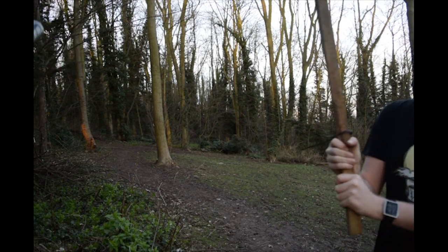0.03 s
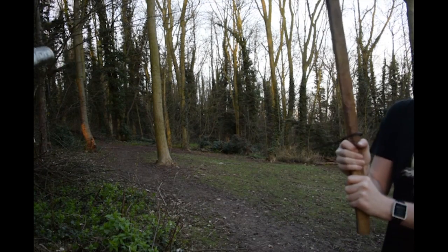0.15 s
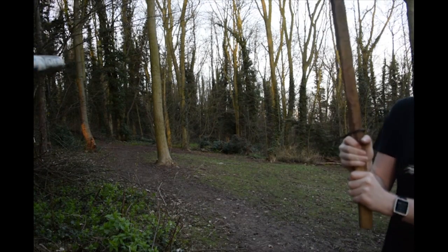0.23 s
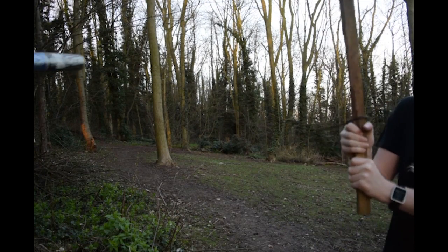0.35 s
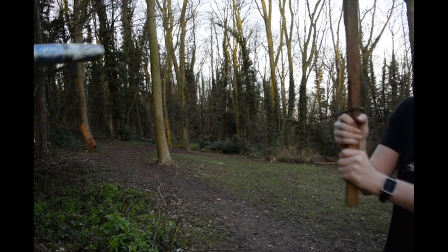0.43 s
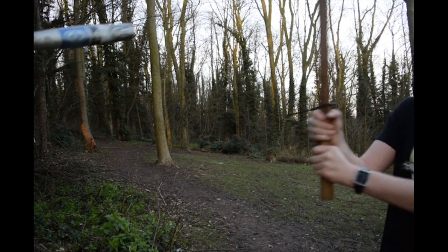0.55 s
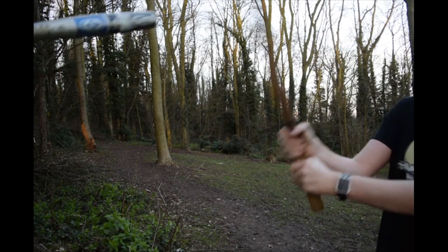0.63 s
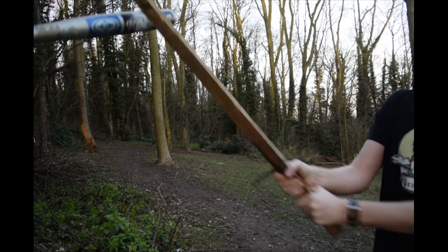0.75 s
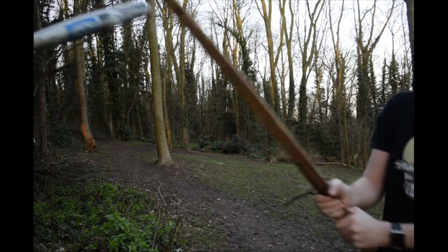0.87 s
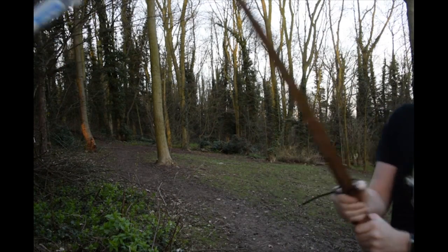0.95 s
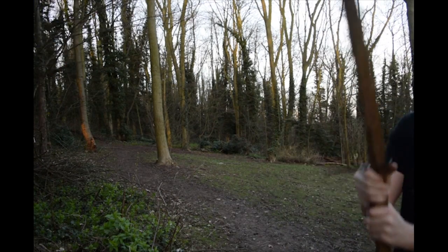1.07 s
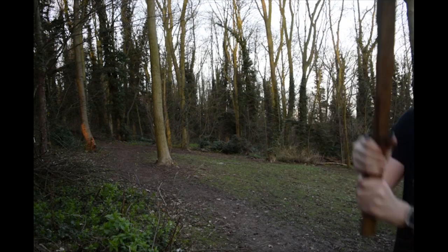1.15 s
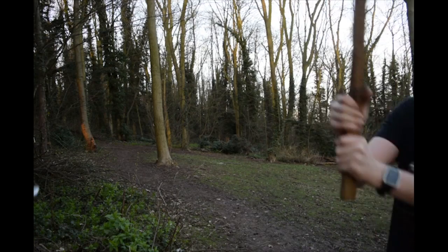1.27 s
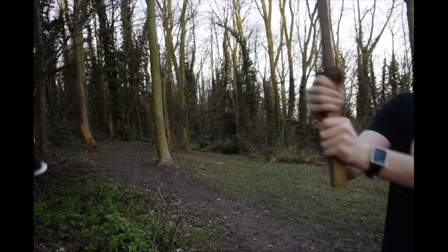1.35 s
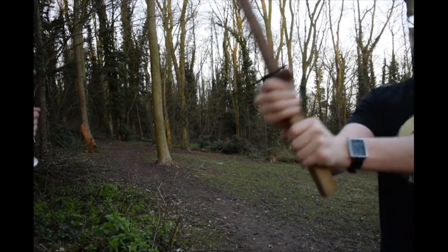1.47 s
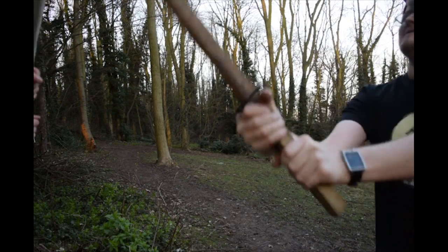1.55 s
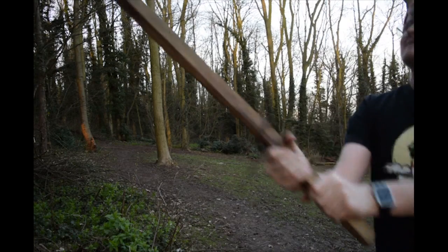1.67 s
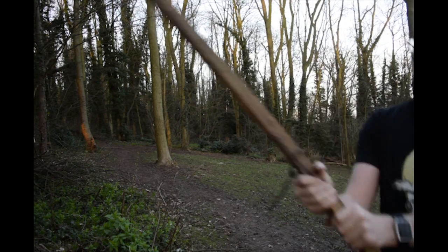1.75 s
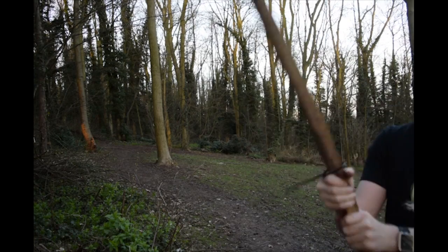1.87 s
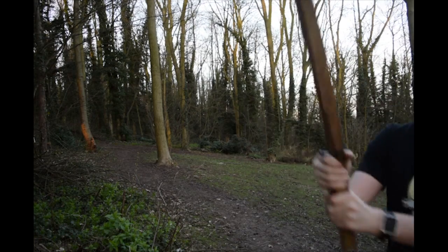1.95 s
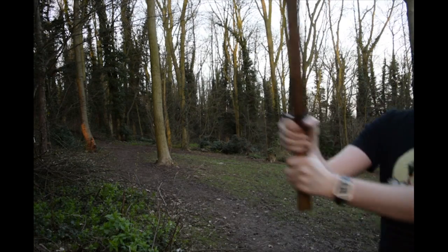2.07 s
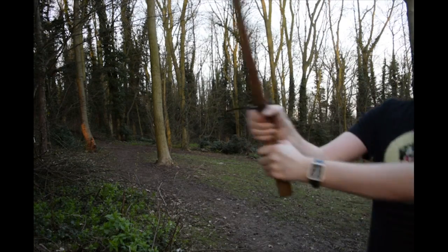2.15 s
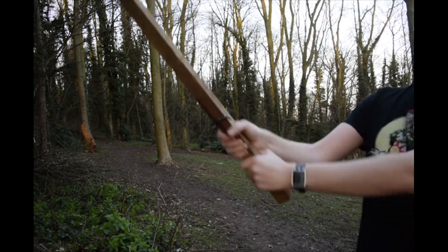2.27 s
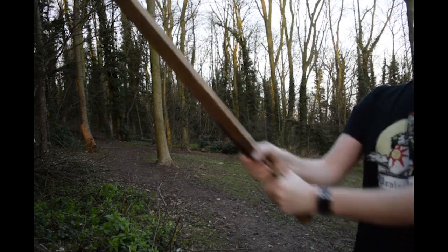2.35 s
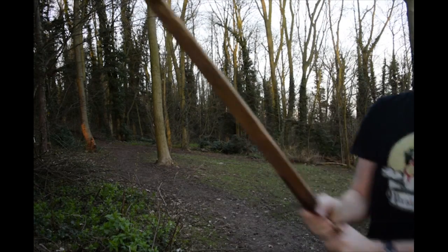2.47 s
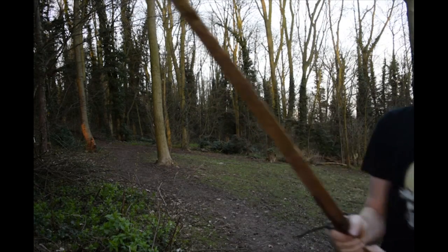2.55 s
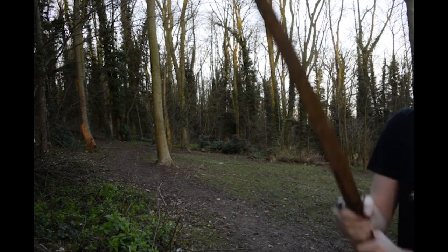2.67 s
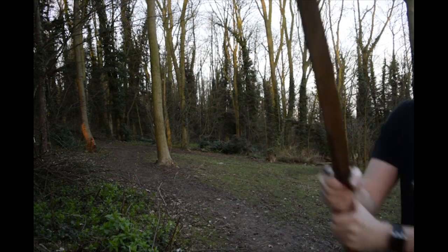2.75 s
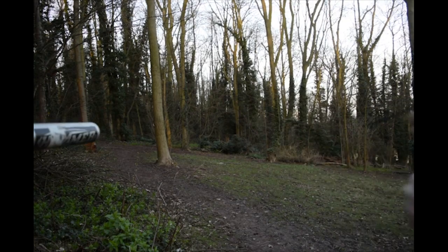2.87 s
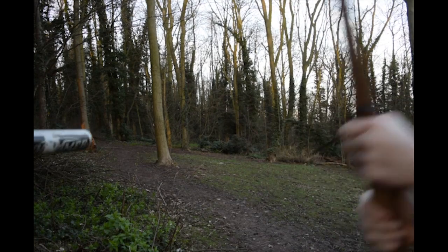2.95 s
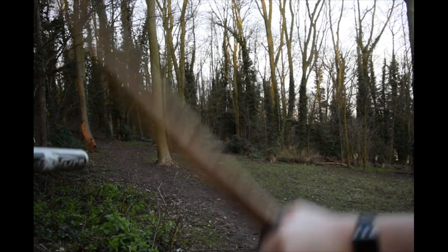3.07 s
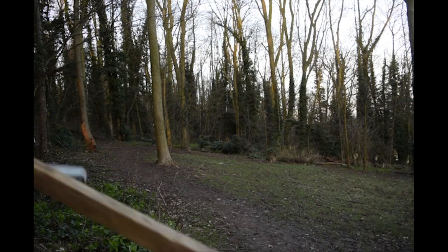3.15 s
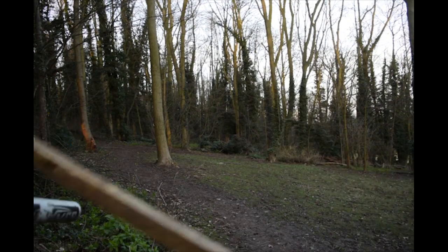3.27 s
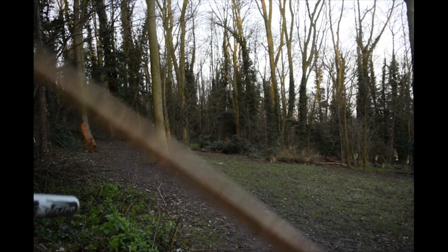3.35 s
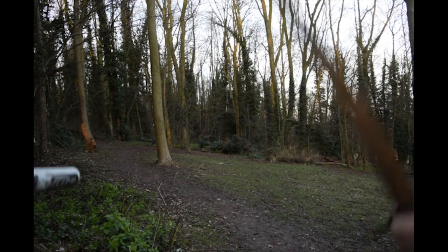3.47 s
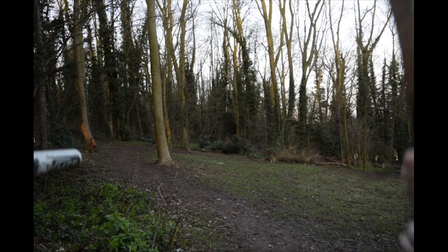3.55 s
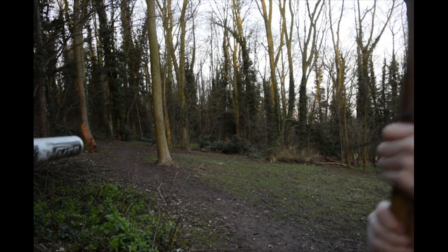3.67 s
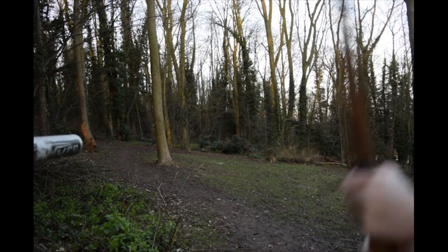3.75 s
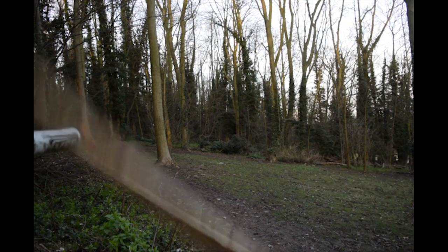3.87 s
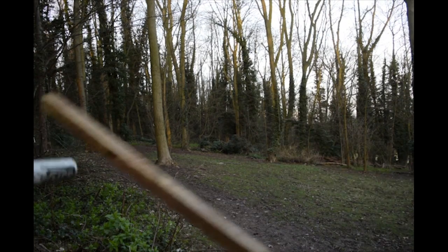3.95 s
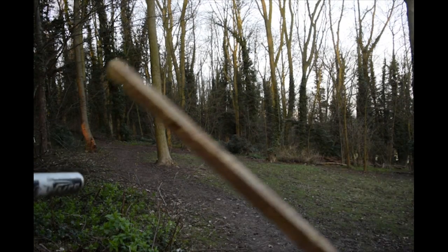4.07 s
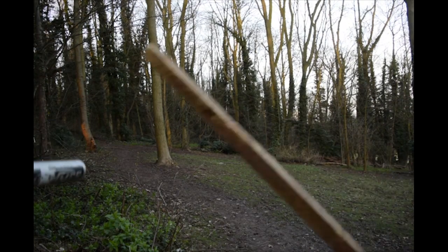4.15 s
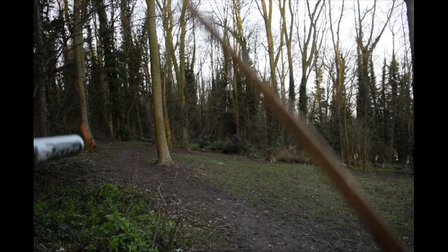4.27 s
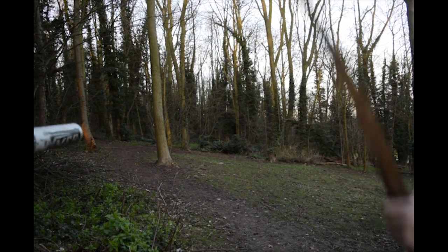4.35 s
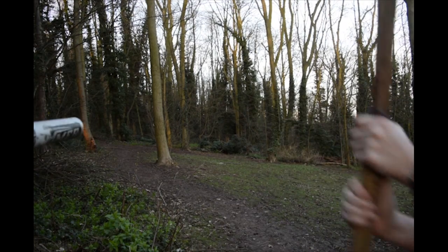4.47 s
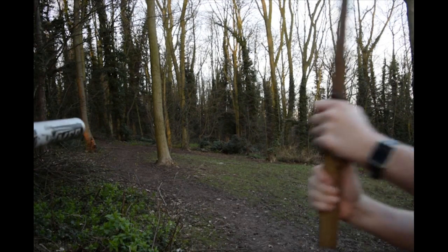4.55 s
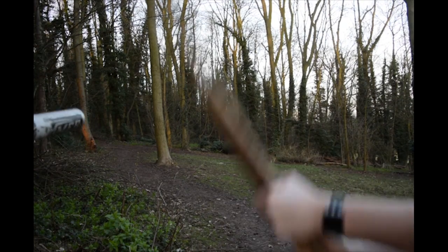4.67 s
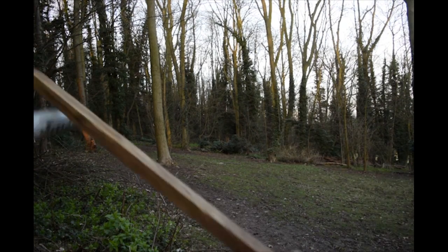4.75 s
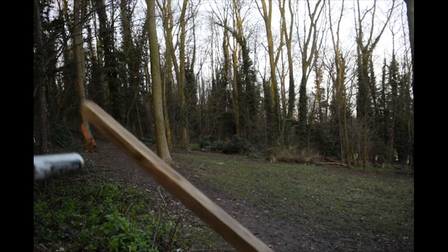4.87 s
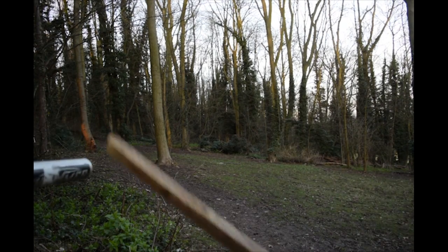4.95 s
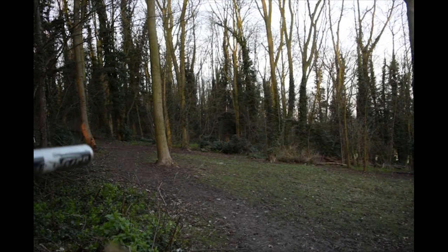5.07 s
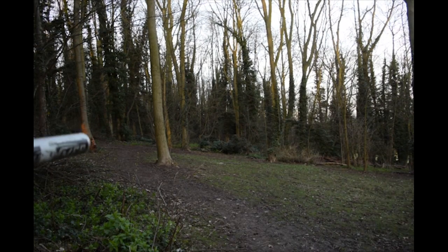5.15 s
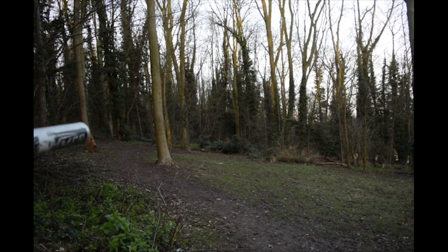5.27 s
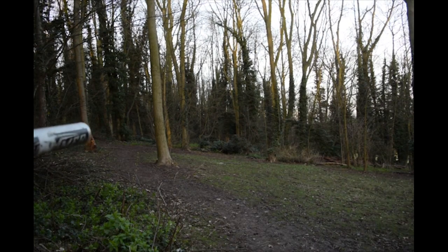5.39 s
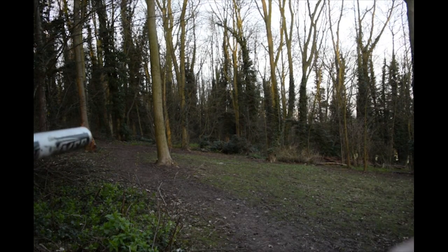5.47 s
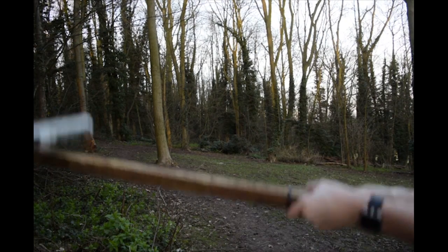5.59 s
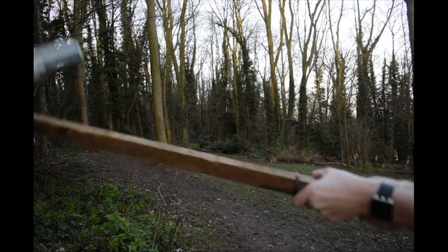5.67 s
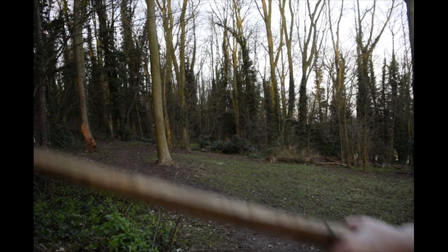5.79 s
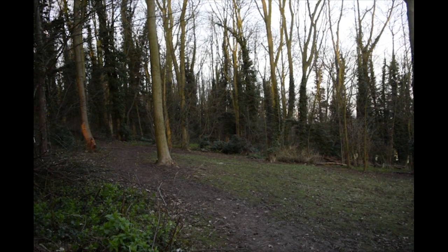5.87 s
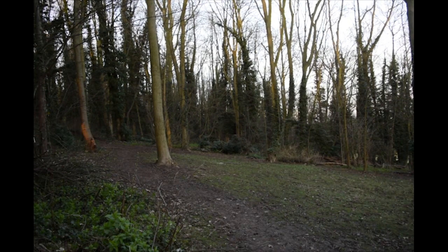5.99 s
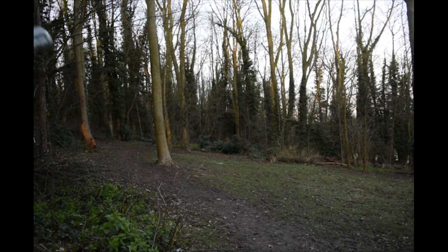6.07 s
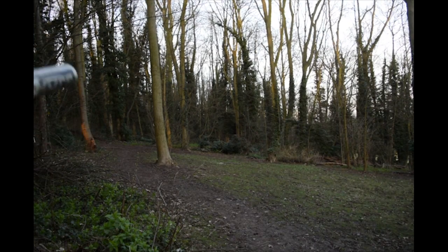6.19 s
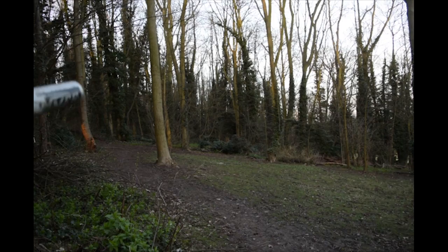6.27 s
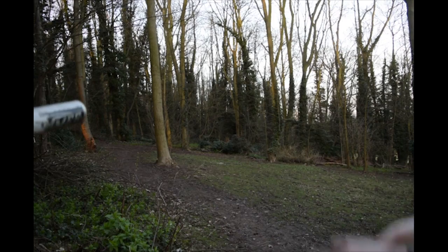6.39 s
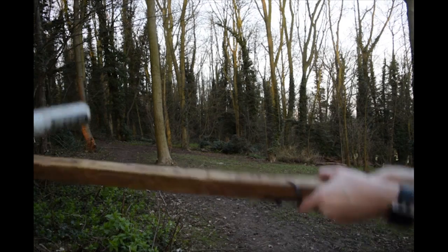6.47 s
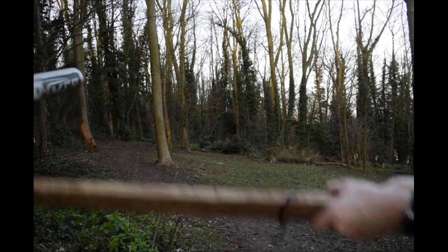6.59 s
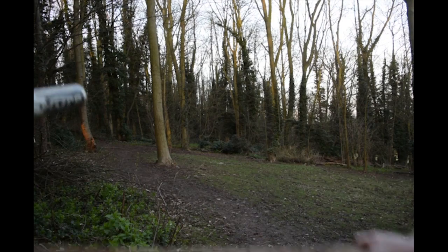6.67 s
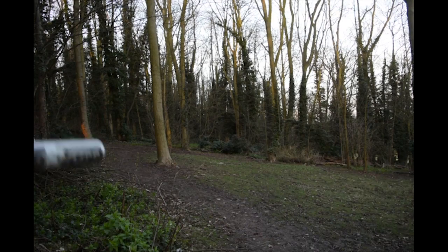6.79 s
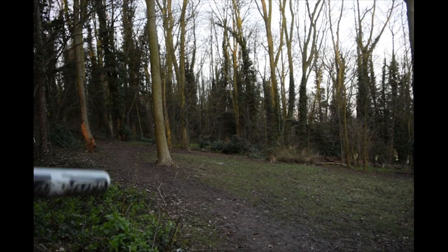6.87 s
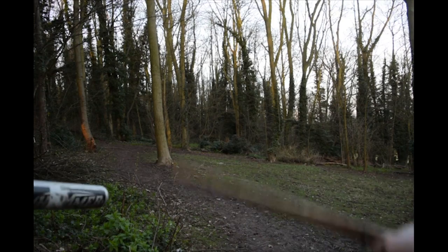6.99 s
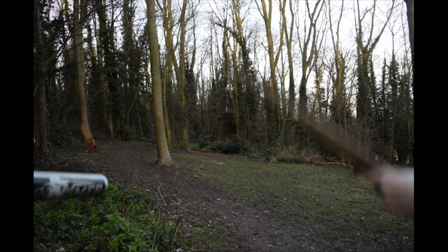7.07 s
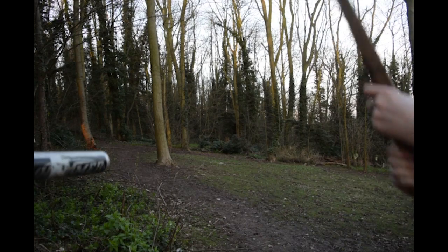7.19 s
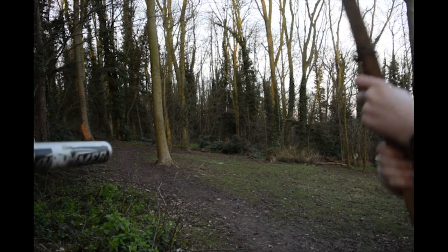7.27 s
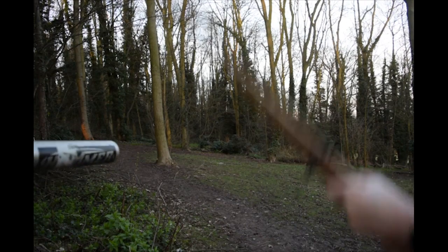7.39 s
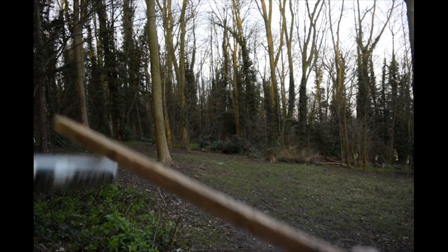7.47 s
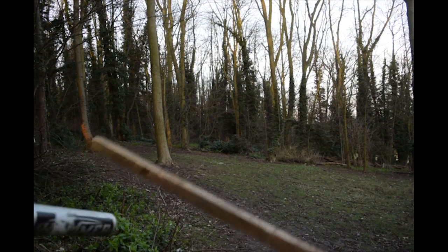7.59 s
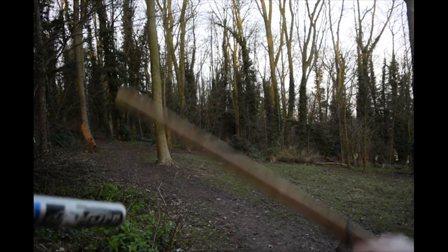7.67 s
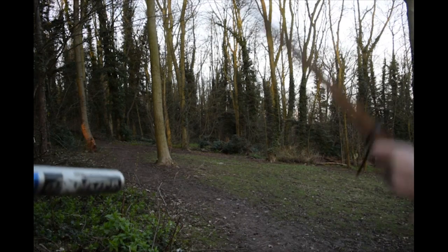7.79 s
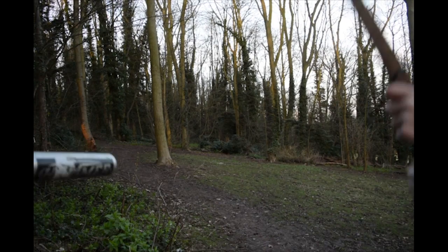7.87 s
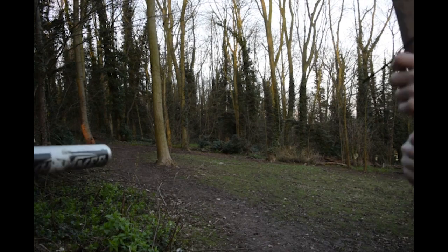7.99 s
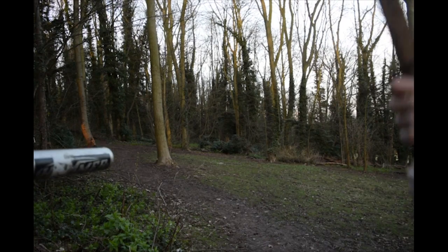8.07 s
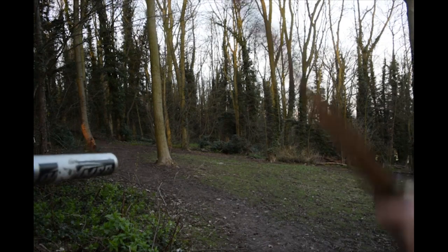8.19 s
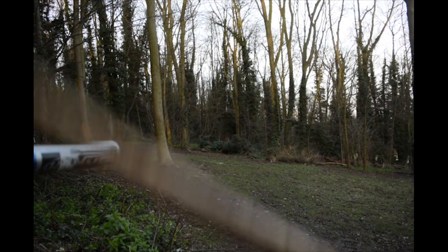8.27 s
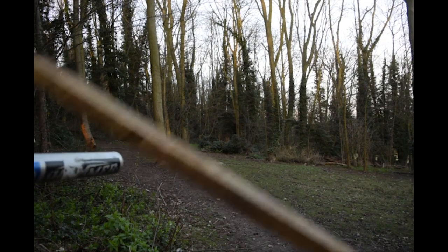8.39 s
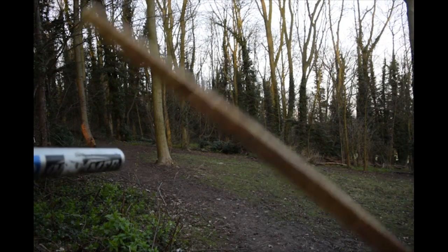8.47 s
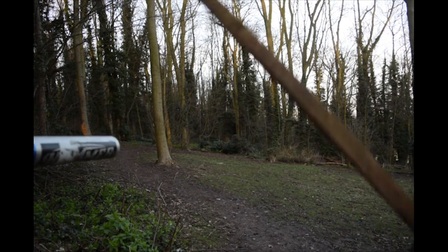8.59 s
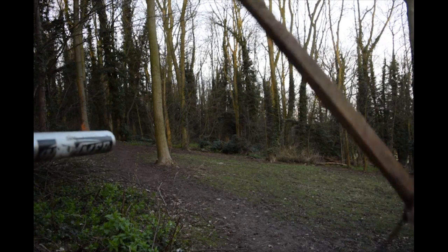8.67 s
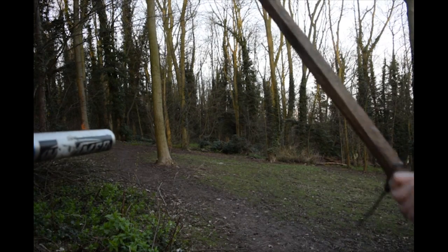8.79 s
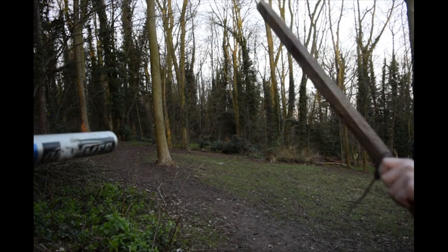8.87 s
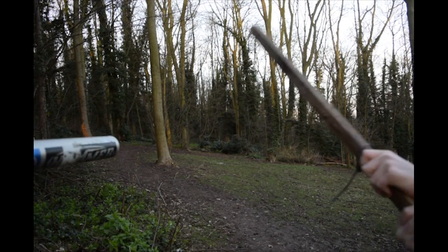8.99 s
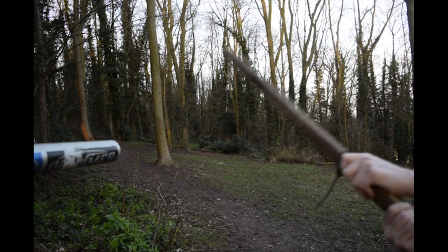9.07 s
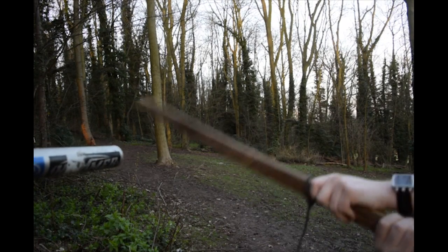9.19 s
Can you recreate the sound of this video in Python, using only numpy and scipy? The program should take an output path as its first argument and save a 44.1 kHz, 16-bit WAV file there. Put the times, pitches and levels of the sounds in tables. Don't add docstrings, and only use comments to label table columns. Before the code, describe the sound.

A long stick strikes a metal bat every three quarters of a second, sharp overloaded cracks outdoors over low distant traffic and faint birds.

```python
import sys
import numpy as np
from scipy import signal
from scipy.fft import rfft, irfft, next_fast_len
from scipy.io import wavfile
from scipy.ndimage import uniform_filter1d

SR = 44100
rng = np.random.default_rng(int(sys.argv[2]) if len(sys.argv) > 2 else 0)


def put_to_file(sound):
    columns = np.atleast_2d(sound).T
    safe = np.clip(columns, -1, 1)
    whole_steps = np.round(safe * 32767)
    wavfile.write(sys.argv[1], SR, whole_steps.astype(np.int16))


def voltage_ratio(decibels):
    exponent = np.asarray(decibels, float) / 20
    return 10 ** exponent


N = 407484


def add(out, at_s, sound):
    i = int(at_s * SR)
    out[i:i + len(sound)] += sound[:len(out) - i]


def fade(t, t60):
    return np.exp(-np.log(1000) * t / t60)


def band(x, lo_hz, hi_hz):
    edges = np.clip([lo_hz, hi_hz], [20, 40], [.44 * SR, .45 * SR])
    return signal.sosfilt(signal.butter(2, edges, "bandpass", fs=SR, output="sos"), x)


def unit(x):
    return x / np.sqrt(np.mean(x ** 2))


def walk(rate_hz, count):
    hold = max(int(SR / rate_hz), 1)
    steps = np.repeat(rng.standard_normal(count // hold + 1), hold)
    smooth = uniform_filter1d(uniform_filter1d(steps, hold), hold)
    return 1.3 * smooth[:count]


# pitch_hz [Hz], level_db [dB per Hz]
TRAFFIC_SPECTRUM = [(15, -34), (70, 0), (315, -7), (950, -6), (2100, -22), (3100, -21), (5530, -33.5),
                    (15500, -38)]


def traffic():
    level_db, top_hz = -52, 15900
    size = next_fast_len(N)
    hz = np.maximum(np.arange(size // 2 + 1) * SR / size, 1)
    pitch_hz, colour_db = np.transpose(TRAFFIC_SPECTRUM)
    colour = voltage_ratio(np.interp(np.log(hz), np.log(pitch_hz), colour_db))
    spectrum = rfft(rng.standard_normal(size)) * colour * (hz < top_hz)
    out, swell = 0, walk(.5, count=N)
    for octave in range(10):
        share = np.clip(1 - abs(np.log2(hz / 31.25) - octave), 0, 1)
        depth_db = 1 if octave < 8 else .2
        drift = voltage_ratio(depth_db * (.45 * swell + 0.55 * walk(17.0, count=N)))
        out = out + irfft(spectrum * share, size)[:N] * drift
    return voltage_ratio(level_db) * unit(out)


# start_s [s] (middle of the puff), length_s [s], level_db [dB],
# pitch_hz [Hz] (band centre), width_hz [Hz]
RUSTLES = [(0.081, .03, -68, 5000, 5000), (.165, 0.064, -61, 5470, 9000), (.365, 0.067, -66, 6460, 4000),
           (0.363, 0.073, -51, 735, 500), (1.094, 0.0055, -60.5, 8500, 9000), (1.269, .03, -63, 4000, 1500),
           (1.348, .03, -58, 3100, 610), (1.357, 0.0071, -64, 6970, 5000), (1.67, .012, -51, 1800, 511),
           (1.871, 0.057, -65, 5000, 5910), (2.498, 0.015, -41.5, 217, 402), (2.868, .06, -70, 4500, 5030),
           (3.643, 0.009, -51, 511, 600), (3.64, 0.024, -63, 3300, 1200), (4.375, .04, -72.5, 6760, 1500),
           (5.157, .03, -69, 6500, 1490), (5.305, 0.051, -64.5, 5000, 6050),
           (8.663, 0.0056, -67, 4500, 5000), (6.121, .02, -63, 3500, 4000), (7.119, .003, -44, 900, 1300),
           (0.367, 0.071, -53.5, 486, 200), (0.358, .03, -63, 2500, 500), (8.681, 0.12, -68.5, 6000, 7024)]


def rustles():
    out = np.zeros(N)
    n = 8192
    t = (np.arange(n) - n / 2) / SR
    for start_s, length_s, level_db, pitch_hz, width_hz in RUSTLES:
        slips = voltage_ratio(3.3 * rng.standard_normal(n // 64).repeat(64))
        grains = rng.standard_normal(n) * slips
        puff = unit(band(grains, pitch_hz - width_hz / 2, pitch_hz + width_hz / 2))
        puff = puff * np.exp(-(2 * t / length_s) ** 2)
        cut = max(int(n / 2 - start_s * SR), 0)
        add(out, max(start_s - n / 2 / SR, 0), voltage_ratio(level_db) * puff[cut:])
    return out


def gliding_tones(table, smear_hz, steady):
    out = np.zeros(N)
    for start_s, length_s, level_db, from_hz, to_hz in table:
        along = walk(6 * smear_hz, count=SR // 2)
        across = walk(6 * smear_hz, count=SR // 2)
        n = int(length_s * SR)
        u = np.arange(n) / n
        phase = 2 * np.pi * np.cumsum(from_hz + (to_hz - from_hz) * u) / SR
        tone = (steady + along[:n]) * np.cos(phase) + across[:n] * np.sin(phase)
        add(out, start_s, voltage_ratio(level_db + 1.6) * np.sin(np.pi * u) ** 0.32 * tone)
    return out


# start_s [s], length_s [s], level_db [dB], start_pitch_hz [Hz], end_pitch_hz [Hz]
SQUEAKS_AND_BIRDS = [(.335, .07, -61.5, 3220, 3350), (.335, .05, -61.5, 4670, 4600),
                     (.34, .045, -65, 6000, 6000), (.4, .28, -87, 8000, 7750), (.93, .11, -80, 7050, 6900),
                     (1.0, 0.17, -76, 7700, 7870), (1.17, .05, -79, 7100, 7250),
                     (1.25, 0.058, -77, 8360, 8070), (3.75, 0.072, -76, 4120, 4100),
                     (5.17, 0.17, -69.5, 4250, 4040), (5.29, .053, -58.5, 3230, 3300),
                     (6.95, .1, -74, 5560, 5500), (6.99, 0.11, -70, 4070, 3980),
                     (6.985, .06, -72, 4350, 4300), (7.06, 0.28, -69.5, 4450, 4480),
                     (7.105, 0.28, -71, 3870, 3720), (7.8, .45, -66.5, 3570, 3440)]


def squeaks_and_birds():
    return gliding_tones(SQUEAKS_AND_BIRDS, smear_hz=70, steady=0.43)


def struck(shapes, spot, push_db):
    node_db, ring_db = -20, -1.5
    half_waves, belly_db = np.transpose(shapes)
    wave = np.cos(np.pi * half_waves * spot + np.pi / 4)
    return belly_db + push_db + ring_db + 10 * np.log10(wave ** 2 + voltage_ratio(node_db) ** 2)


# pitch_hz [Hz], t60_s [s] while the hands damp the shock,
# tail_db [dB] share that rings on, tail_t60_s [s]
STICK_LOW = [(138.7, 0.084, -20, .16), (381, 0.015, -13, 0.083), (643, 0.025, -14.5, 0.06),
             (1121, 0.012, -16, .065), (1258, .018, -15.5, .05)]
STICK_HIGH = [(1635, .013, -18, .055), (2091, 0.0089, -18, .06), (2500, 0.0027, -18, .06),
              (3212, 0.015, -21, .07), (5040, 0.0099, -22, .05), (4450, .014, -20.5, 0.034)]
BAT = [(803, .03, -14, 0.059), (1770, 0.016, -17.5, .06), (2978, .056, -37, .45), (3683, 0.027, -17, 0.054),
       (3890, .012, -24, 0.11)]


def blow(mode_db, crack_db, contact_s, tick_db, grip_hz):
    t = np.arange(SR // 4) / SR
    hz, t60, tail_db, tail_t60 = np.transpose([*STICK_LOW, *STICK_HIGH, *BAT])[:, :, None]
    hz[2] = grip_hz
    lateness, detune = rng.standard_normal((2, len(hz), 1))
    since = np.maximum(t - .08 * contact_s * abs(lateness), 0)
    shock_shape = fade(np.maximum(since - contact_s, 0), t60)
    shape = shock_shape + voltage_ratio(tail_db) * fade(since, tail_t60)
    modes = shape * np.sin(2 * np.pi * hz * (1 + 0.0018 * detune) * since)
    sign = (-1.) ** np.argsort(np.argsort(hz, axis=0), axis=0)
    ring = (sign * voltage_ratio(mode_db)[:, None] * modes).sum(axis=0)
    grit = unit(band(rng.standard_normal(len(t)), 800, 3600))
    crack = voltage_ratio(crack_db) * grit * (fade(t, 6 * contact_s) + voltage_ratio(-22.0) * fade(t, 0.088))
    tick = voltage_ratio(tick_db) * unit(band(rng.standard_normal(len(t)), 4000, 14000)) * fade(t, 0.0064)
    return ring, crack + 0.33 * tick


# low_hz [Hz], high_hz [Hz], near_db [dB], near_t60_s [s],
# far_db [dB], far_t60_s [s]
TRUNKS = [(300, 1100, 9.5, .15, -3, 0.78), (850, 2000, 6.5, .13, 2.5, .85), (2600, 4100, 9.5, .2, 3.5, 1),
          (4300, 9000, 9.5, .13, -4, 0.77), (9000, 19000, 14.5, .08, -3, .16)]


def trunks():
    far_row_s, far_rise_s = .13, 0.11
    t = np.arange(SR) / SR
    swell = np.where(t < far_row_s, np.exp(-.5 * ((t - far_row_s) / far_rise_s) ** 2), 1)
    out = 0
    for low_hz, high_hz, near_db, near_t60, far_db, far_t60 in TRUNKS:
        near = voltage_ratio(near_db) * fade(t, near_t60)
        far = voltage_ratio(far_db) * swell * fade(np.maximum(t - far_row_s, 0), far_t60)
        out = out + (near + far) * band(rng.standard_normal(SR), low_hz, high_hz)
    lumps = voltage_ratio(1.8 * walk(43, count=SR))
    return out * lumps * np.minimum(t / .008, 1) / np.sqrt(0.055 * SR)


# start_s [s], crack_db [dB], contact_s [s], echo_db [dB] from the trunks
BLOWS = [
    (0.751, -1, .0035, -35),
    (1.5738, -4.5, .0018, -34),
    (2.2986, -5, .002, -37),
    (3.1989, -6, .003, -38.5),
    (3.9462, -1.5, 0.0024, -39),
    (4.7989, -6, .004, -31),
    (5.6444, 0.5, .003, -35.5),
    (6.5205, -2.5, .004, -37),
    (7.5193, -2, .0033, -35.5),
    (8.3523, 1.5, .0055, -33),
]
# stick_spot [0-1 along it], stick_push_db [dB], bat_spot [0-1 along it],
# bat_push_db [dB], grip_hz [Hz] third stick mode under this grip
SPOTS = [(0.496, -3.0, 0.496, -0.1, 705), (0.074, -5.1, 0.22, 1.4, 800), (0.192, 1.3, 0.05, -2.6, 640),
         (0.272, -0.1, 0.504, -4.5, 642), (0.044, 3.9, 0.072, -0.4, 625), (0.588, 4.0, 0.21, -7.7, 650),
         (0.486, -4.0, 0.052, 9.5, 630), (0.05, 5.4, 0.328, -3, 622), (0.642, -0.1, 0.252, -3.5, 700),
         (0.628, -2.4, 0.112, -1.3, 590)]
# half_waves [count along the body], belly_db [dB] when struck on a belly
STICK_SHAPES = [(2.14, -18.1), (2.13, -8.7), (3.78, 1.4), (5.91, -0.9), (4.77, 1.0), (6.31, 1.7),
                (6.03, -1.0), (7.75, -6.7), (7.46, -1.08), (9.14, -15.0), (7.39, -10.4)]
BAT_SHAPES = [(2.31, 0), (3.05, -0.56), (4.37, -1.5), (6.05, -7.5), (5.85, -2.23)]


def clacks():
    out = np.zeros(N)
    click = np.arange(SR // 10) == 0
    pulse = band(click, 810, 5900)
    pulse = pulse + voltage_ratio(-15) * band(click, 4000, 14000)
    shock_fade = fade(np.arange(len(pulse)) / SR, 0.023)
    for (start_s, crack_db, contact_s, echo_db), spot in zip(BLOWS, SPOTS):
        stick_spot, stick_db, bat_spot, bat_db, grip_hz = spot
        stick_modes_db = struck(STICK_SHAPES, stick_spot, stick_db)
        bat_modes_db = struck(BAT_SHAPES, bat_spot, bat_db)
        tick_db = 3.5 + 1.2 * crack_db
        ring, crack = blow(np.r_[stick_modes_db, bat_modes_db], crack_db, contact_s, tick_db, grip_hz)
        add(out, start_s, ring + crack)
        add(out, start_s + 0.0065, voltage_ratio(-12) * band(crack, 500, 6000))
        shock = band((ring + crack)[:len(pulse)], 300, 4000) * shock_fade
        far = voltage_ratio(-1) * shock + voltage_ratio(crack_db + 22) * pulse
        add(out, start_s, voltage_ratio(echo_db) * signal.fftconvolve(far, trunks()))
        add(out, start_s + .099, voltage_ratio(-50) * band(shock, 500, 5958))
    return out


# start_s [s], length_s [s], level_db [dB], start_pitch_hz [Hz], end_pitch_hz [Hz]
COOS = [
    (6.58, 0.2, -62, 469, 530),
    (8.53, 0.094, -65, 502, 520),
    (8.98, 0.267, -64, 490, 525),
]


def dove():
    return gliding_tones(COOS, smear_hz=7.7, steady=0.89)


def scene():
    mix = traffic() + rustles() + squeaks_and_birds() + clacks() + dove()
    return mix[None]


def top_cut(x):
    return signal.sosfilt(signal.butter(12, 16920, fs=SR, output="sos"), x)


def record(dry):
    clipped = np.clip(dry, -1, 1)
    coupling = signal.butter(1, 40, "highpass", fs=SR, output="sos")
    return top_cut(signal.sosfilt(coupling, clipped))


dry = scene()
out = record(dry)
put_to_file(out)
```